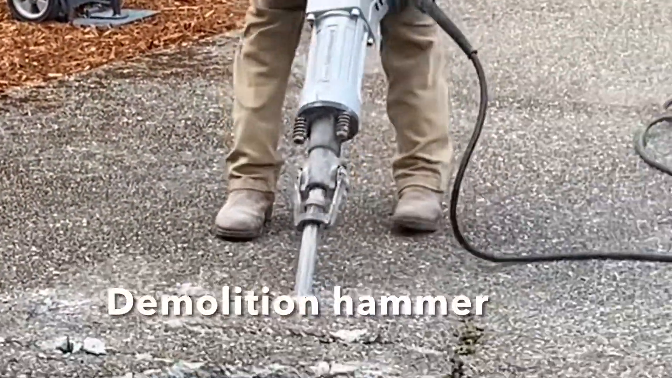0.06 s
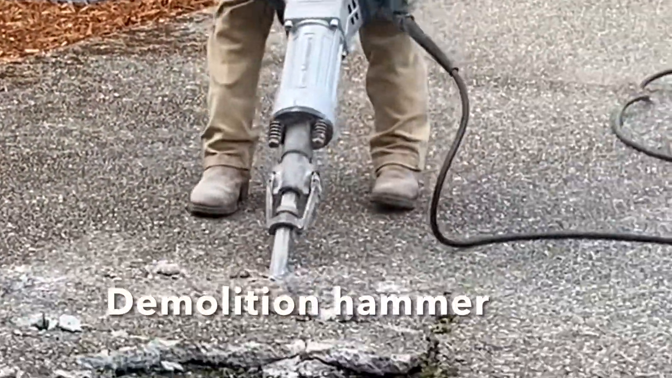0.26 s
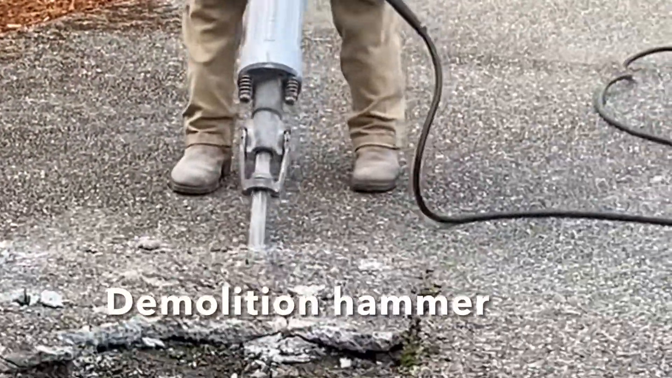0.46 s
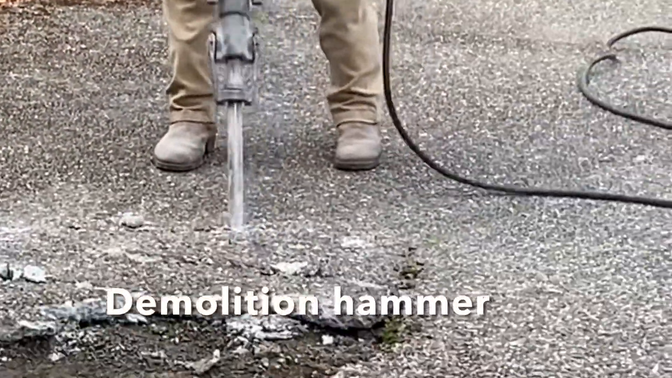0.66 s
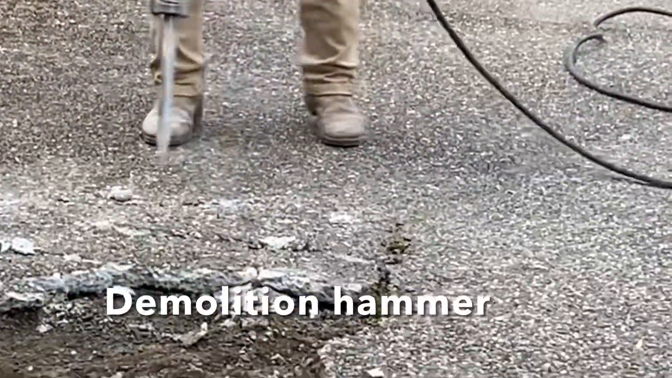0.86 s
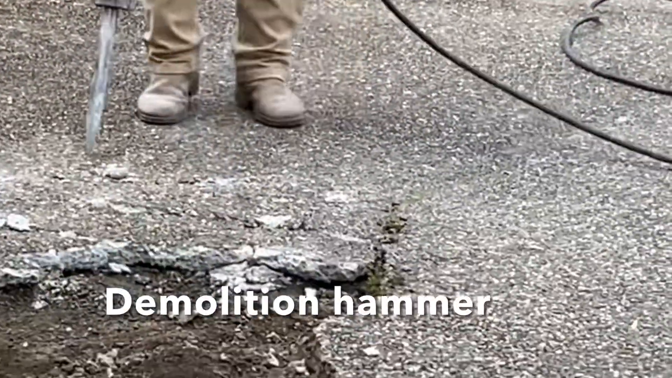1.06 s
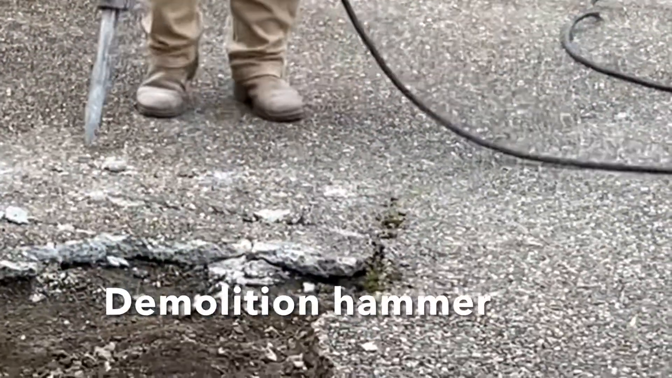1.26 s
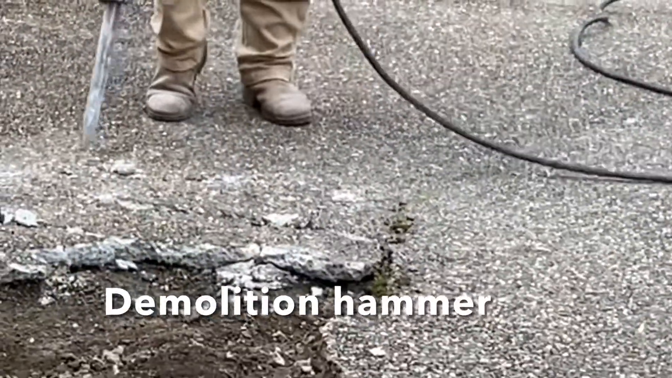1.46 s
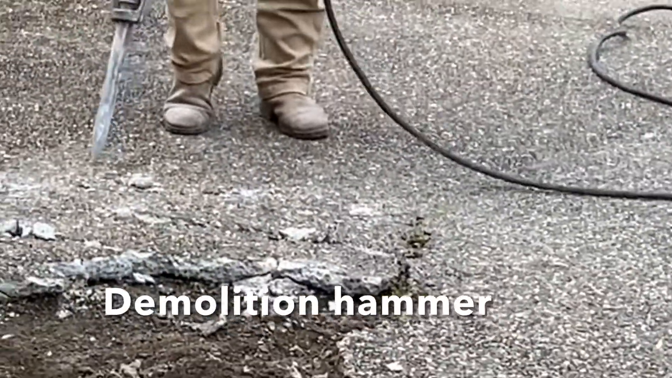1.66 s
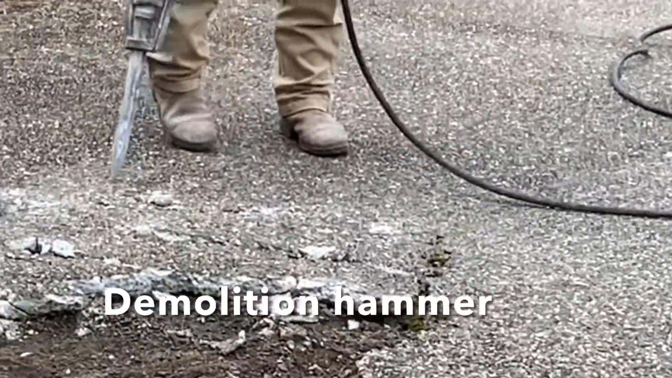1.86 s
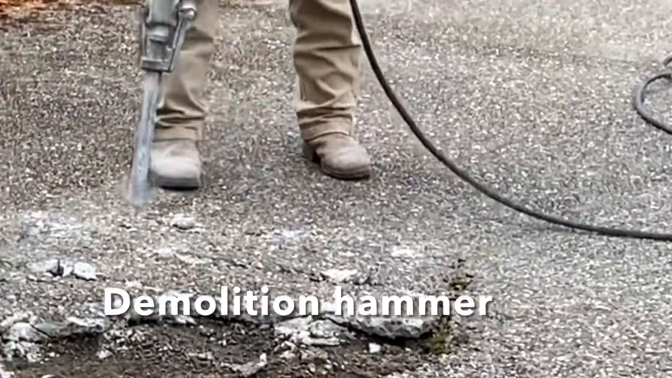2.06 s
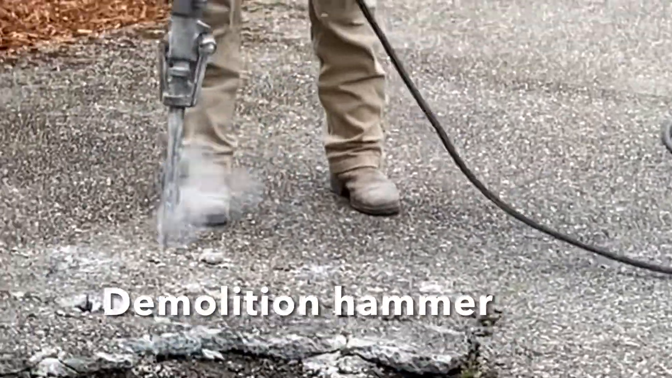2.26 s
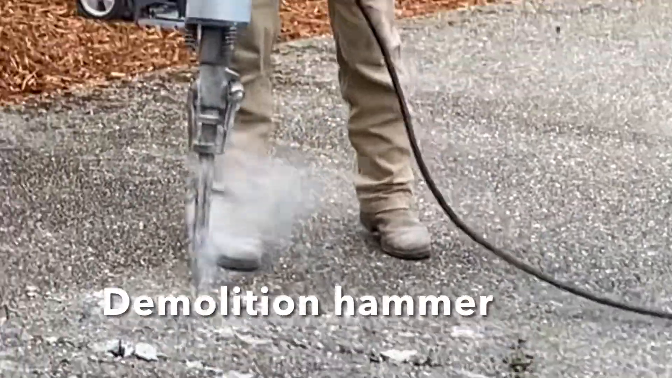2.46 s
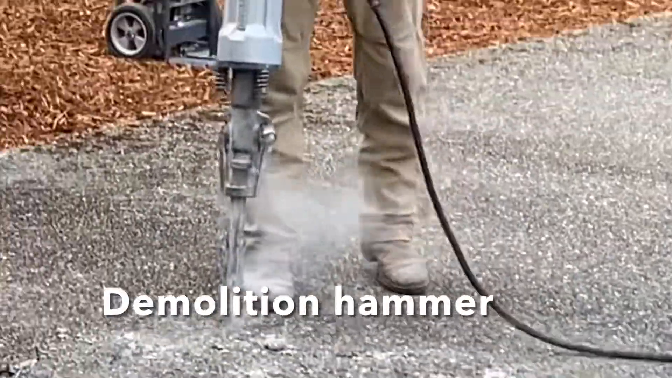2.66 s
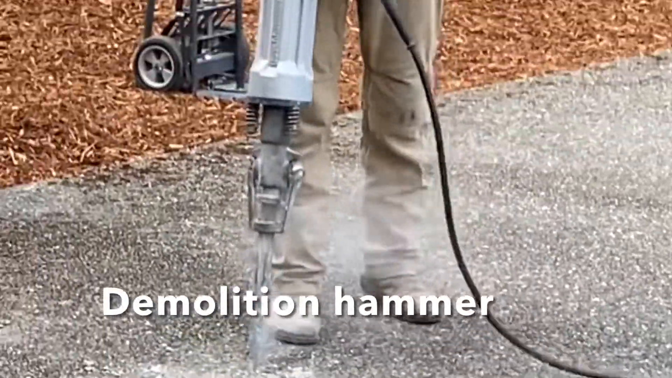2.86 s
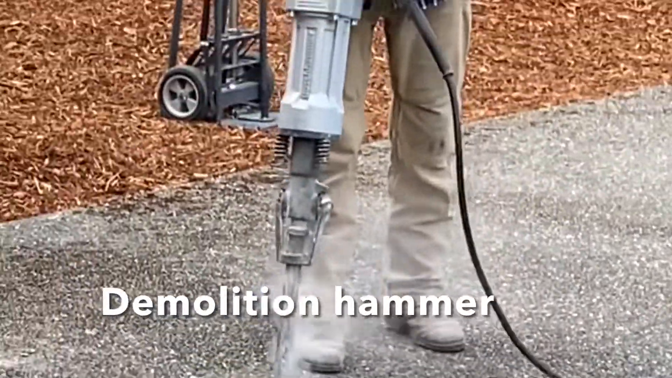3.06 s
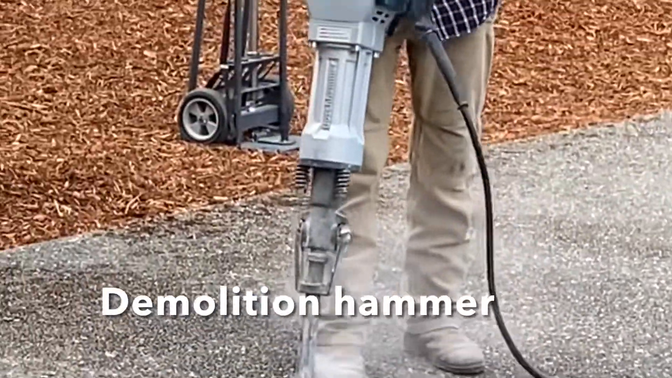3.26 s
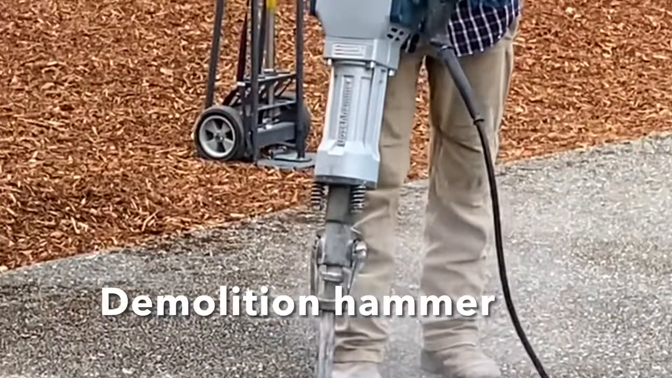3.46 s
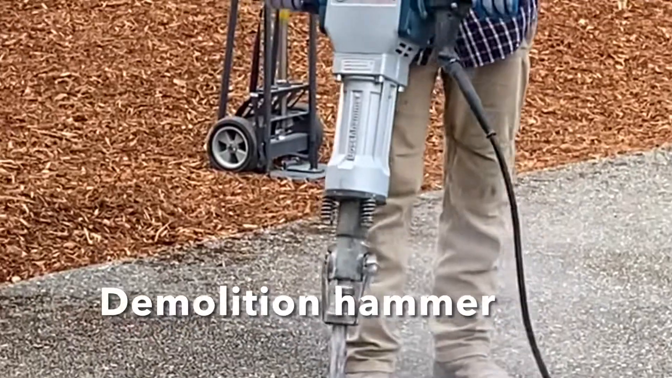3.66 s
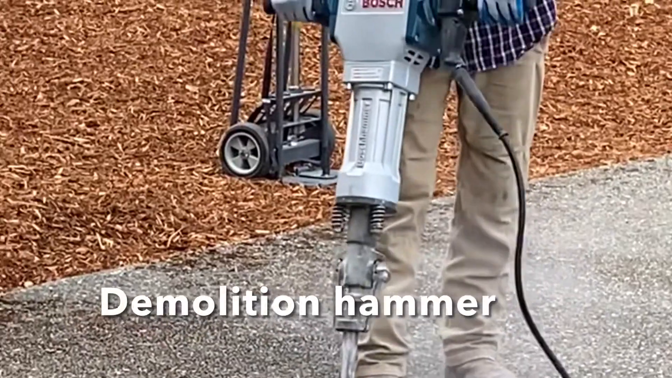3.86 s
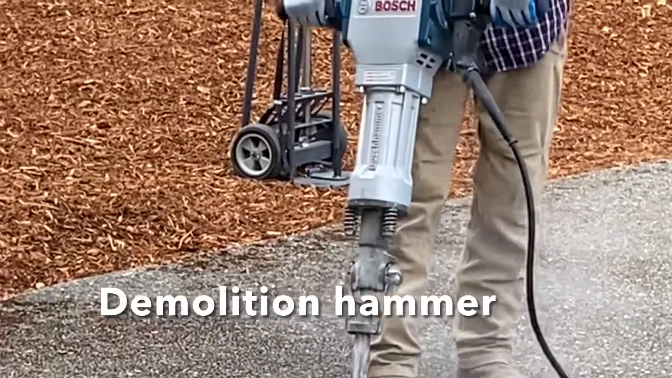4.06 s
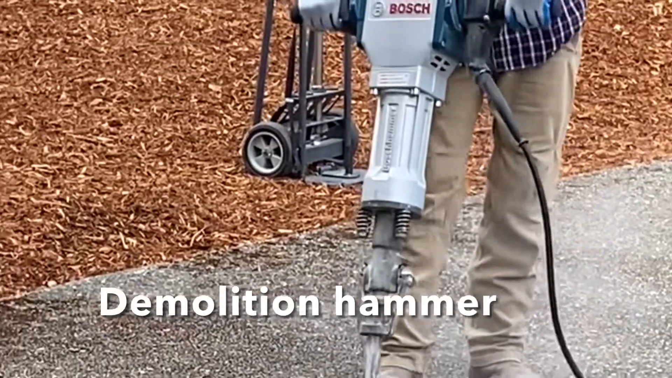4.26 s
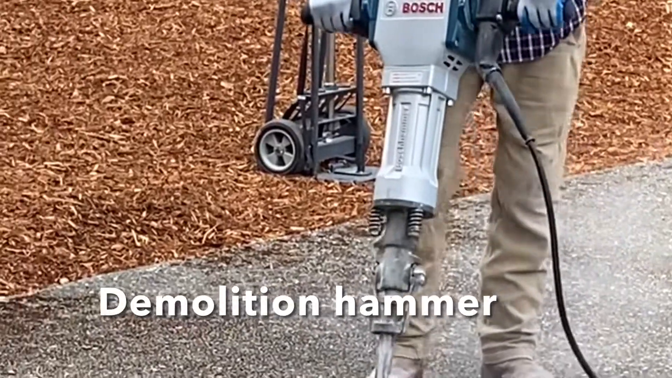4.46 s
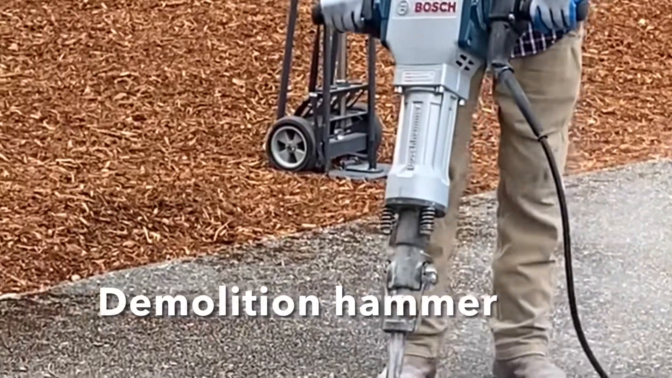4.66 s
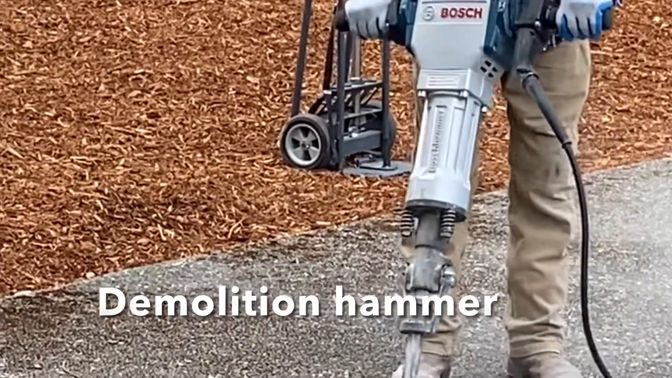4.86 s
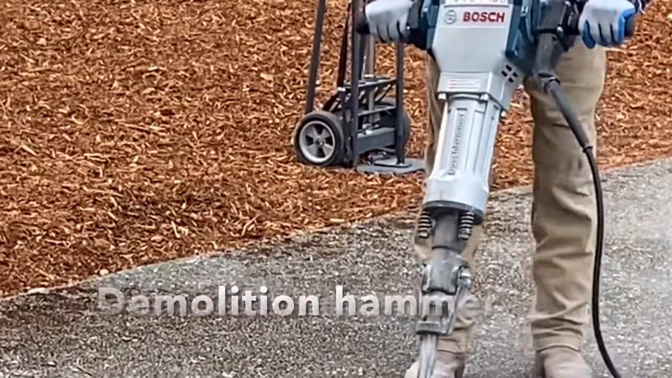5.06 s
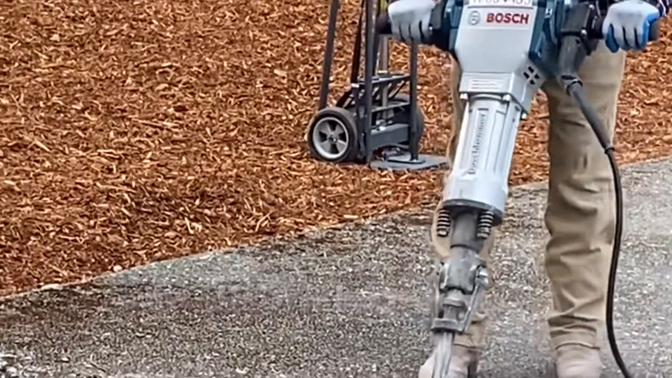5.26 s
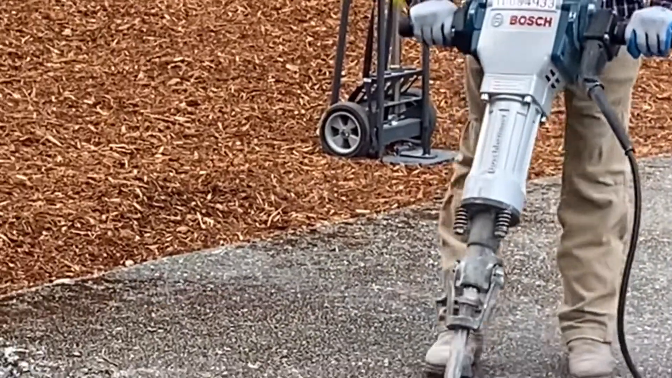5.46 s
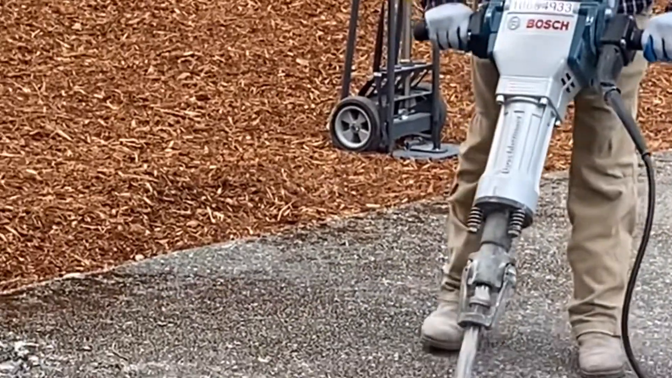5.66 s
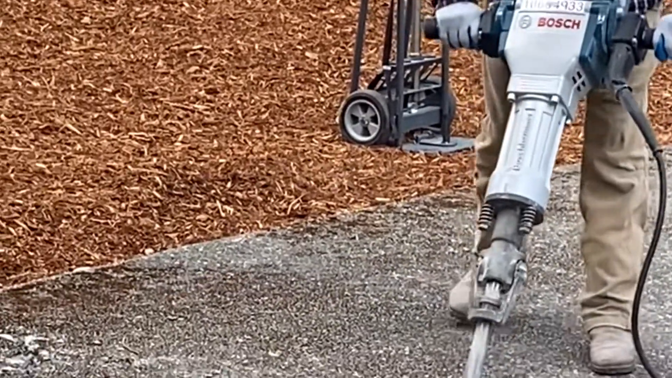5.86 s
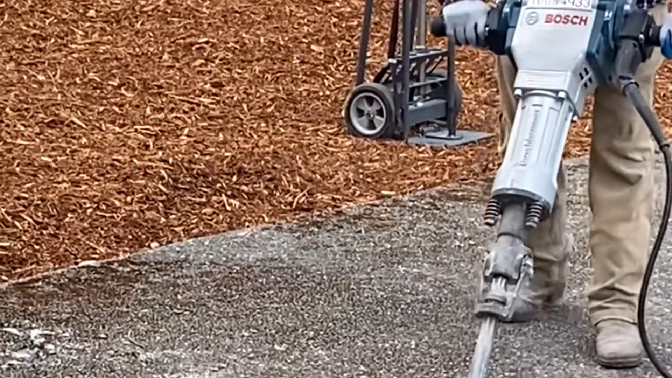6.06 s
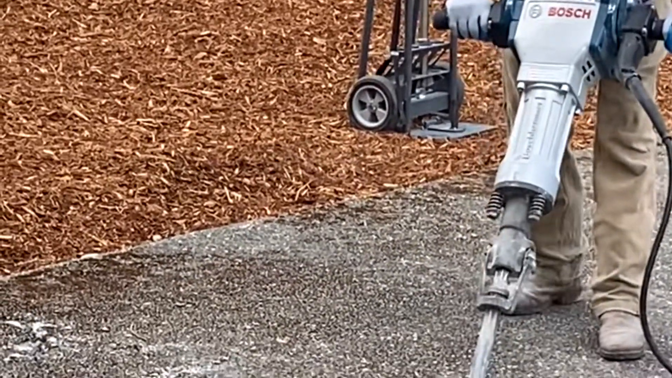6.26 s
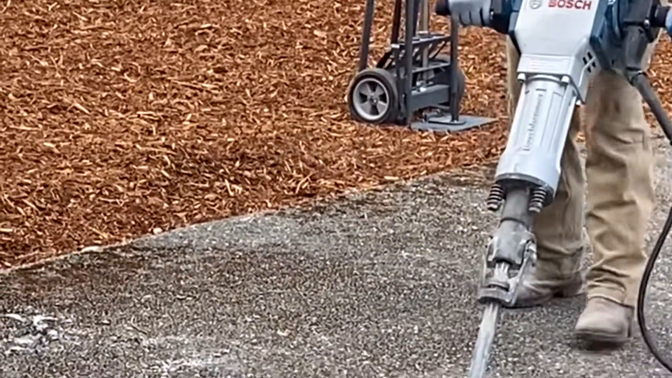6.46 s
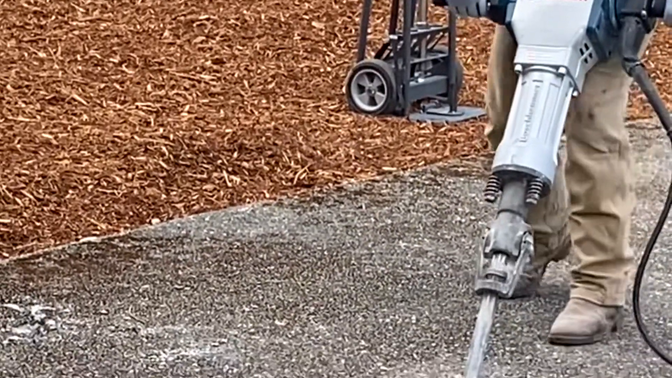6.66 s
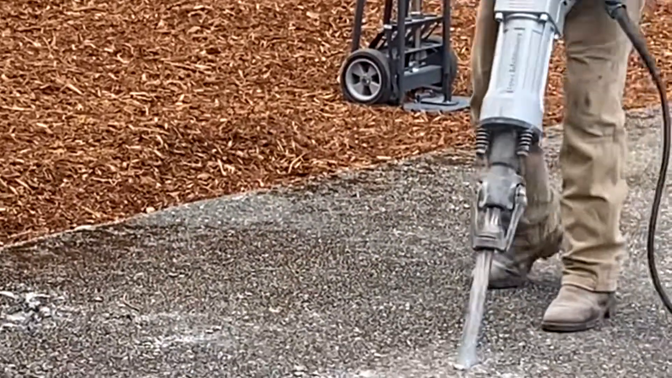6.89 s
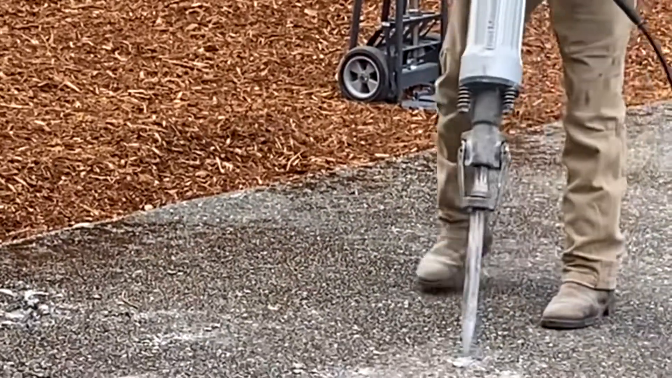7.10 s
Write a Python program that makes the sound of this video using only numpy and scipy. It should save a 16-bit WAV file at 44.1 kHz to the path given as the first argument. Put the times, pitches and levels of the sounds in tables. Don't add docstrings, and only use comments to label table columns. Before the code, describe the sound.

Outdoors a few metres away, an electric demolition hammer runs down while its loose steel bit clanks in the holder. The tip scrapes over clicking grit. The tool starts again, bouncing with sharp cracks and bright ringing steel, then bites into the concrete in a dense, even hammering with ground thuds and chips. It stops; the motor whine falls and the bit clangs once.

```python
import sys
import numpy as np
from scipy import signal
from scipy.fft import rfft, irfft, next_fast_len
from scipy.io import wavfile
from scipy.ndimage import uniform_filter1d, minimum_filter1d, map_coordinates

SR = 44100
rng = np.random.default_rng(int(sys.argv[2]) if len(sys.argv) > 2 else 0)


def dump(signal):
    limited = np.clip(np.atleast_2d(signal).T, -1, 1)
    pcm = np.round(limited * 32767).astype(np.int16)
    wavfile.write(sys.argv[1], SR, pcm)


def natural_amplitude(level_db):
    exponent = np.asarray(level_db, float) / 20
    return 10 ** exponent


N = 314433

RUN_S = (1.59, 6.17)

# start in seconds, low ring, high ring and bending ring in dB,
# seconds until the slab damps the tip.
BOUNCES = [(1.963, -39, -40.5, -34, 0.0137), (2.0603, -46, -36, -39, 0.035),
           (2.142, -21.5, -28, -35, 0.042), (2.217, -22, -29.5, -31, 0.052),
           (2.2905, -31, -26.5, -39, 0.024), (2.367, -23.5, -25.5, -36, 0.05),
           (2.4357, -41, -33, -38.5, 0.04), (2.5101, -29.5, -22.5, -38, 0.048),
           (2.58, -32, -21.5, -39, 0.022), (2.6538, -28.5, -23.5, -31.5, 0.038),
           (2.723, -26.5, -31.5, -42, 0.05), (2.789, -35, -36, -42, 0.028), (2.8617, -38, -34, -49, 0.043),
           (2.932, -38, -30, -54, 0.037), (3.005, -36, -53, -55, 0.014), (3.077, -34, -38, -50, 0.016),
           (3.148, -31.5, -37, -54, 0.049), (3.2187, -37, -54, -47, 0.014), (3.3564, -37, -46, -50, 0.025),
           (3.429, -37.5, -38.5, -55, 0.044), (3.499, -43, -52, -59, 0.037)]
# frequency in Hz, level in dB, T60 in seconds.
BIT_GROUPS = [
    [(5600, -5.5, 1)],
    [(11120, -2, 0.7), (11260, -8, 0.57)],
    [(4792, 0.5, 0.29), (3140, -13.5, 0.24), (6670, -7.5, 0.26)],
    [(8930, -2, 0.75)],
]
TWIST_DB = -14.5
RISE_S = [.0004, .0004, 0.0057, .002]
# start in seconds, level of the four groups in dB, seconds free.
CLANG = (6.843, -37, -30.5, -21, -31, 0.32)
# start in seconds, level in dB, high group in dB re low, seconds until damped.
CLANKS = [(.0005, -34, 7.5, 0.0068), (0.0576, -18.5, -1.5, 0.0032), (0.062, -19.5, -8.5, 0.004),
          (0.0656, -13, -12, 0.0025), (0.0686, -17, -12, 0.0054), (0.129, -25, -2.5, 0.0033),
          (0.1323, -14.5, -16, 0.003), (0.1352, -14.5, -17.5, 0.005), (0.197, -26.5, -3, 0.0077),
          (0.2068, -21.5, -19, 0.0055), (0.272, -19, -11.5, 0.0069), (0.3415, -17.5, -17.5, 0.0088),
          (6.844, -19, -13, 0.008), (6.894, -27.5, -14, 0.0082)]
# frequency in Hz, level in dB, T60 in seconds.
HOLDER = [
    [(5594, 3.5, 0.08), (5673, -1.5, 0.09), (3150, -25.5, 0.25), (4920, -17, 0.078)],
    [(11170, -5.5, .15), (11060, -9.5, .1)],
]
# frequency in Hz, level in dB, T60 in seconds.
SHANK = [(5610, -26, 2.4), (5650, -42, .9), (11180, -27, .9)]
# [Hz, dB, T60 in seconds].
SQUEAK = (.068, -27.5, .016, [(3070, -1.5, .2), (4800, -7, 0.22)])

# time in seconds, level in dB.
WHIRR = [(0, -35.5), (.11, -49.5), (.36, -50.5), (.44, -45), (.65, -42.5), (.98, -44.5), (1.01, -41.5),
         (1.1, -46), (1.21, -46.5), (1.75, -53.5), (1.9, -47.5), (1.98, -37.5), (2.9, -36), (3.16, -34),
         (3.31, -38), (5.4, -38), (6.1, -39), (6.67, -36), (7.13, -39)]
# frequency in Hz, density in dB per Hz.
GEARS = [(290, -26), (500, -8), (666, -2.5), (859, -1), (1480, -4.5), (2240, -4), (2740, -5), (3380, -1),
         (3940, -5.5), (5430, -5), (7000, -31.5), (9100, -23.5), (15400, -120)]
FAN = [(4500, -37), (6000, -2), (7400, 1), (8500, -2.5), (10300, -6), (12100, -6), (14000, -10),
       (15600, -12), (16200, -38)]
RUMBLE = [(76, -49), (130, -8), (184, 0), (434, -4), (510, -14), (700, -6.5), (910, -52), (1540, -120)]
# time in seconds, change in dB, half length in seconds.
DRAG = [(0.424, -3, .03), (0.507, 3.5, 0.023), (0.592, 5.5, .014), (0.633, -9, 0.012), (0.729, -8, 0.0062),
        (0.765, 2.5, .008), (0.83, -12, 0.0077), (0.919, -14, 0.008), (0.939, -10, .006), (0.98, -2, .008),
        (1.131, 9, 0.0072), (1.168, -8, 0.012), (1.247, -8, 0.0079), (1.272, 4, .008), (1.291, 5, .005),
        (1.333, -10, 0.0072), (1.405, -6, 0.0065), (1.489, 5, 0.0051), (1.506, -12, 0.006),
        (1.568, -10, 0.0047), (1.594, -16, 0.0078), (1.61, 4, .006), (1.697, -13, .01), (1.814, -13, .006)]
# time in seconds, gear mesh in Hz, mesh level in dB, commutator level in dB.
MESH = [(0, 1715, -56, -50), (.045, 1790, -49, -45), (.06, 1720, -58, -54), (.115, 1774, -69, -57),
        (.14, 1757, -75, -66), (.4, 1603, -73, -73), (1.9, 1499, -73.5, -69), (2.2, 1765, -46.5, -71),
        (3.5, 1744, -47.5, -60), (5.4, 1733, -48, -63), (5.7, 1766, -47, -54), (6, 1873, -48.5, -53),
        (6.22, 2034, -47, -50), (6.33, 2190, -43, -49), (6.4, 2242, -48, -53), (6.5, 2326, -47, -38),
        (6.58, 2223, -55, -50), (6.65, 2155, -56, -42), (6.75, 2030, -43.5, -53), (6.9, 1810, -52, -65),
        (7.13, 1700, -78, -67)]
# multiple, level in dB.
TEETH = [(1, -3), (2, 1), (3, -4)]
# crank turn 0-1, speed factor, load in dB.
CRANK = [(0, .94, -4), (.12, .96, -7), (.6, 1.03, -5), (.76, 1.02, 5.5), (1, 0.87, 4.5)]
# time in seconds, level in dB.
DRONE = [(0, -67), (.9, -66), (1.05, -54), (1.28, -52), (1.5, -60), (1.66, -53), (1.8, -59), (2.1, -54),
         (3.5, -51), (4.5, -49), (5.4, -54), (5.8, -60), (7.13, -56)]

# frequency in Hz, width in Hz, level in dB, arrival in seconds.
GROUND = [(66.5, 7.6, 1, 0.0442), (106, 20.7, -3, 0.0239), (51.6, 7, -13.5, 0.045)]
# frequency in Hz, level in dB.
DEEP = [(15, -55), (25, -37), (70, -2.5), (88, -4), (103, -9.5), (140, -13), (180, -57.5), (310, -120)]
# time in seconds, level in dB.
TRAFFIC = [(0, -70), (.9, -61.5), (1.05, -58.5), (7.13, -57.5)]
# frequency in Hz, T60 in seconds.
YARD = [(150, 0.85), (1000, 0.2), (4000, 0.28), (12000, 0.15)]

# start in seconds, crack in dB, thud and knock in dB re crack.
LOOSE = [(0.0563, -24.5, -7.5, -28), (0.128, -30, -34, -20.5), (0.1986, -45.5, -42, -39.5),
         (0.2685, -24, -40, -20.5), (0.34, -26.5, -21.5, -18.5), (0.9991, -33.5, -8.5, -16),
         (1.478, -52.5, -0.5, -14), (1.645, -56.5, -3, -1), (1.821, -41.5, -16, -20),
         (1.9626, -18.5, -10.5, -28), (2.0593, -12.5, -19.5, -27), (2.142, -13.5, -12, -25),
         (2.2184, -15.5, -7.5, -19), (2.2913, -13.5, -12, -12), (2.3645, -11, -11.5, -21),
         (2.4373, -14.5, -12.5, -14), (2.5091, -12, -10.5, -15), (2.5797, -20, -2.5, -10),
         (2.654, -18, -3.5, -7.5), (2.7217, -20.5, -2.5, -10.5), (2.7908, -14, -9.5, -18),
         (6.771, -20.5, -9, -23.5), (6.8227, -33, -12, -13), (6.8277, -28, -7.5, -14.5),
         (6.845, -21.5, -45, -11.5)]
# start in seconds, peak in dB, thud and knock in dB re peak.
STRUCK = [(2.8606, -8, -22.5, -29), (2.9313, -8, -21.5, -32.5), (3.005, -9.5, -22, -30),
          (3.0748, -7, -21.5, -31), (3.1462, -10, -20, -24), (3.217, -7.5, -20.5, -29.5),
          (3.2886, -11, -17, -24.5), (3.3573, -8, -19.5, -26), (3.429, -11.5, -16, -20),
          (3.4997, -9, -18.5, -26.5), (3.5694, -10, -18, -22.5), (3.6404, -7.5, -18, -25),
          (3.7119, -6.5, -20.5, -27), (3.784, -6.5, -20.5, -31), (3.855, -8.5, -18, -23),
          (3.9263, -8, -16.5, -22.5), (3.9985, -9, -16.5, -21), (4.07, -8, -17, -24.5),
          (4.1423, -8, -16, -18.5), (4.2145, -7, -16, -23), (4.287, -8, -16.5, -23),
          (4.3593, -9, -17.5, -22), (4.433, -8, -20.5, -23.5), (4.5061, -7.5, -20.5, -24),
          (4.58, -9, -20.5, -23), (4.6534, -8.5, -22.5, -22), (4.727, -8.5, -21.5, -25.5),
          (4.8019, -8, -21, -28), (4.8746, -6, -22.5, -21), (4.949, -6, -21.5, -24.5),
          (5.0218, -7.5, -19.5, -23), (5.0948, -7, -21, -22.5), (5.168, -6, -23, -25),
          (5.2425, -7, -23, -23), (5.3166, -6, -22.5, -28), (5.39, -6.5, -24.5, -25.5),
          (5.4645, -5.5, -31.5, -25), (5.5378, -5, -34, -25.5), (5.61, -5, -34, -26.5),
          (5.6827, -4, -38, -26.5), (5.7543, -6, -35, -24.5), (5.825, -6.5, -32, -23),
          (5.8959, -6, -32.5, -24.5), (5.9658, -7, -33.5, -23), (6.0344, -9.5, -28, -22),
          (6.101, -10.5, -24.5, -19.5), (6.1651, -17, -23, -14.5)]
STRUCK_DB = [-7.5, 11.5, 8.5]
# time in seconds, level in dB.
BITE = [(2.86, -41), (3.1, -33.5), (3.42, -37.5), (3.75, -38.5), (4.15, -37.5), (4.45, -36), (4.73, -40.5),
        (5.05, -41), (5.4, -49), (5.6, -38), (5.75, -45.5), (6.08, -42), (6.17, -51)]
# frequency in Hz, level in dB.
CRACK = [(880, -7), (1500, -12), (2540, -6), (3520, -4), (4270, -2.5), (5620, 2), (6030, -3.5),
         (7310, -8.5), (8600, -7.5), (9720, -6), (11900, -6), (13500, -12), (15300, -7.5), (16300, -41),
         (16800, -40)]
KNOCK = [(300, -18.5), (500, 0.5), (750, 0), (1000, -5.5), (1500, -4), (2100, -10.5), (3000, -30.5)]
# frequency in Hz, width in Hz, extra gain.
STRIKER = [(3570, 210, 2.36), (5690, 380, 2.16)]
# frequency in Hz, width in Hz, level in dB, arrival in seconds.
SLAB = [(251.7, 26.3, 1, 0.0158), (434.3, 39.5, -2.5, 0.00921), (160.5, 35, -9, 0.0161),
        (339, 36, -10, 0.0119)]
# time in seconds, slow ground waves, shank tone and top of the crack in dB.
SINK = [(2, -0.5, 2, 5.5), (2.5, -2, 6, 3.5), (3.2, -3, 5, -2), (3.7, -3, 1.5, -1), (4.2, -5, -4.5, -2.5),
        (4.5, 2.5, -5.5, 1), (5.2, 6.5, -3, 2), (5.45, 7, 1, 2.5), (5.7, -5, -0.5, -3), (5.899, -2, -8, 0),
        (6.15, -2.5, -4, -9.5)]

# start in seconds, peak in dB.
TICKS = [(0.714, -33), (1.0034, -35), (1.011, -29.5), (1.0218, -38.5), (1.134, -41), (1.4873, -45),
         (1.515, -44), (1.553, -37), (1.577, -46), (1.6077, -54), (1.713, -43), (2.488, -24), (2.628, -27),
         (6.7549, -30), (6.974, -30)]
# from and to in seconds, first and last Hz, level in dB re crack.
SEATED = [(2.28, 2.85, 780, 900, -12), (2.26, 2.6, 870, 1200, -17.5), (3.3, 5.6, 735, 700, -12),
          (3.8, 4, 1100, 960, -15), (4.7, 6.4, 830, 1000, -11.5), (4.34, 5.88, 1210, 1350, -13),
          (3.86, 3.6, 1590, 1300, -12.5), (3.9, 4.7, 1800, 1800, -17), (3.5, 6.4, 3560, 3620, -11.5),
          (4.6, 5.6, 3580, 3600, -8), (4.0, 5.9, 4800, 4700, -12.5), (4.5, 6.4, 3100, 3060, -13.5)]

# frequency in Hz, likeness 0-1.
ALIKE = [(150, .995), (300, .9), (640, .68), (1400, .72), (3100, .88), (6800, .88), (15000, .75)]
# frequency in Hz, phase in radians.
LEAD = [(60, 0), (200, -.2), (350, -.55), (750, -.65), (1400, -.45), (2400, .42), (3300, .25), (5700, .95),
        (6300, 1.7), (7400, 3.14), (10400, 6.28), (13450, 9.42), (16300, 12.3)]
# frequency in Hz, level in dB.
TILT = [(60, 0), (110, 0), (200, 1.5), (380, 1), (700, 0), (1290, -1.5), (2380, 0), (15000, 0)]
# centre in Hz, half width in Hz.
GAPS = [
    [(7400, 950), (13300, 1250), (17000, 1250)],
    [(3450, 1650), (10450, 900), (17000, 1500)],
]
SPARED_HZ = [13700, 6000]


def unit(x):
    return x / np.sqrt(np.mean(x ** 2) + 1e-20)


def along(points, hz):
    f, v = np.transpose(points)
    return np.interp(np.log(hz + 1), np.log(f + 1), v)


def curves(rows):
    s, *cols = np.transpose(rows)
    return [np.interp(np.arange(N) / SR, s, c) for c in cols]


def wobble(rate):
    at = np.arange(0, N + 16, 16)
    knots = rng.standard_normal(int(N * rate / SR) + 4)
    return np.interp(np.arange(N), at, map_coordinates(knots, [at * rate / SR]))


def filtered(x, response):
    n = x.shape[-1]
    m = next_fast_len(n + SR // 4)
    return irfft(rfft(x, m) * response(np.fft.rfftfreq(m, 1 / SR)), m)[..., :n]


def add(track, s, x):
    part = track[round(s * SR):][:len(x)]
    part += x[:len(part)]


def rush(spectrum, patchy_db):
    z = signal.stft(rng.standard_normal((2, N)), nperseg=512)[2]
    field = uniform_filter1d(uniform_filter1d(rng.standard_normal(z.shape[1:]), 8, 0), 6, 1)
    pair = signal.istft(z * natural_amplitude(patchy_db * unit(field)), nperseg=512)[1][:, :N]
    return unit(filtered(pair, lambda hz: natural_amplitude(along(spectrum, hz))))


def waves(modes):
    return lambda hz: sum(natural_amplitude(db) * np.exp(-.5 * ((hz - c) / w) ** 2 - 2j * np.pi * hz * late)
                          for c, w, db, late in modes)


def ring(modes, free, damped_db, grip, rough_db=1.5, bend=0, rise=0.00034, size=SR // 7):
    t = np.arange(size) / SR
    gripped = (t - free) / grip
    hold = natural_amplitude(damped_db * np.clip(gripped, 0, 1)) * (1 - np.exp(-t / rise))
    bent = t + bend * np.cumsum(np.clip(gripped + 1, 0, 2) / 2) / SR
    total = np.zeros(size)
    for hz, db, t60 in modes:
        rub, slip = [map_coordinates(rng.standard_normal(60), [t * 150]) for _ in range(2)]
        tone = np.sin(2 * np.pi * hz * bent + .18 * rough_db * slip)
        total += natural_amplitude(db + rough_db * rub - 60 * t / t60) * tone
    return hold * total


def bit():
    track, t = np.zeros(N), np.arange(SR // 20) / SR
    for s, db, high_db, free in CLANKS:
        for level_db, group in zip((db, db + high_db), HOLDER):
            add(track, s, natural_amplitude(level_db + 4.5) * ring(group, free, damped_db=-17.0, grip=0.0052, rough_db=1.0))
        if s < RUN_S[0]:
            tone = ring(SHANK, free, damped_db=-1, grip=0.93, rough_db=4.0, size=SR // 3)
            add(track, s, natural_amplitude(db - 11.0) * tone)
        hiss = uniform_filter1d(rng.standard_normal(len(t)), size=3) * 1.55
        add(track, s, natural_amplitude(db - 19.0 - 60 * np.clip(t - free, 0, 1) / 0.056) * hiss)
    s, db, free, modes = SQUEAK
    add(track, s, natural_amplitude(db) * ring(modes, free, damped_db=-25.5, grip=.012, bend=.04))

    bends, losses_db, rubs_db = [.03, 0, .015, 0], [-20, -15, -18, -20], [2.6, 4.5, 3.8, 5]
    bounces = [(s, low, high, bend, high + TWIST_DB, free) for s, low, high, bend, free in BOUNCES]
    for s, *levels, free in bounces + [CLANG]:
        lifted = s == CLANG[0]
        size = round(free * SR) + SR // 7
        for db, group, bend, loss_db, rub_db, rise in zip(levels, BIT_GROUPS, bends, losses_db, rubs_db, RISE_S):
            if lifted:
                tone = ring(group, free, -27, grip=.06, rough_db=.7 * rub_db, rise=rise, size=size)
            else:
                tone = ring(group, free, loss_db, grip=0.006, rough_db=rub_db, bend=bend, rise=rise, size=size)
            add(track, s, natural_amplitude(db + 7.5) * tone)
    return track


def rattle():
    rattle_db, t60 = -3, 0.13
    kicks = np.zeros(N)
    rings = [(row[0], row[2]) for row in BOUNCES + [CLANG]]
    clanks = [(row[0], row[1] + row[2]) for row in CLANKS]
    for s, db in rings + clanks:
        kicks[round(s * SR)] += natural_amplitude(2 * (db + rattle_db))
    return np.sqrt(signal.lfilter([1], [1, -natural_amplitude(-120 / (t60 * SR))], kicks))


def drag():
    t = np.arange(N) / SR
    return sum(db * np.exp(-((t - s) / half) ** 2) for s, db, half in DRAG)


def busy():
    t = np.arange(N) / SR
    return uniform_filter1d(1. * (t > RUN_S[0]) * (t < RUN_S[1]), size=SR // 20)


def motor():
    gear_db, = curves(WHIRR)
    fan_db = -52.5 + 1.53 * (gear_db + 38.5) + 6.5 * busy()
    rumble_db = -57.5 + (gear_db + 37.5) + 12 * busy()
    scrape_db = (gear_db < -42) * wobble(45) + drag()
    shake_db = 1.2 * wobble(25) + 1.2 * wobble(90) + scrape_db
    gears = natural_amplitude(gear_db - 3.0 + shake_db) * rush(GEARS, patchy_db=1.8)
    fan = np.hypot(natural_amplitude(fan_db), rattle()) * natural_amplitude(0.57 * shake_db) * rush(FAN, patchy_db=3.5)
    rumble = natural_amplitude(rumble_db + 1.1 * wobble(14)) * rush(RUMBLE, patchy_db=2.5)
    return gears + fan + rumble


def whine(rows):
    mesh_hz, mesh_db, thin_db = curves(MESH)
    t = np.arange(N) / SR
    times = rows[(rows[:, 0] > RUN_S[0]) & (rows[:, 0] < RUN_S[1]), 0]
    crank = np.interp(t, times, np.arange(len(times))) % 1
    at, speed, load_db = np.transpose(CRANK)
    loaded = (t > times[0]) & (t < times[-1])
    braked = np.where(loaded, np.interp(crank, at, speed), 1)
    turn = 2 * np.pi * np.cumsum(mesh_hz * braked * (1 + 0.00252 * wobble(30))) / SR
    mesh = np.zeros(N)
    for k, db in TEETH:
        level = natural_amplitude(db + 1.5 - 11 * (k - 1.39) * ~loaded)
        fuzz = np.where(loaded, .8 + .45 * wobble(80), .5 + .8 * wobble(120))
        mesh += level * fuzz * np.sin(k * (turn + 2.0 * ~loaded * wobble(70)))
    mesh *= natural_amplitude(mesh_db + loaded * np.interp(crank, at, load_db))
    thin = natural_amplitude(thin_db + 2.5 + 1.5 * wobble(25)) * np.sin(turn * 3 / 2)
    drone_level = natural_amplitude(curves(DRONE)[0] + 3 + 2 * wobble(12) + drag()) * (.8 + .4 * wobble(100))
    drone = drone_level * np.sin(2 * np.pi * 2385 * t + 2.3 * wobble(80))
    return mesh + thin + drone


def ground(rows):
    push = np.zeros(N)
    at = np.round(rows[:, 0] * SR).astype(int)
    push[at] = natural_amplitude(rows[:, 4])
    slow, quick = filtered(push, lambda hz: np.array([waves(GROUND[::2])(hz), waves(GROUND[1::2])(hz)]))
    power = np.mean(np.abs(waves(GROUND)(np.arange(SR // 2))) ** 2) * len(at) / N
    shake = (natural_amplitude(curves(SINK)[0]) * slow + quick) / np.sqrt(power)
    swell = uniform_filter1d(push, size=round(.09 * 2 * SR)) * SR / 14
    traffic = natural_amplitude(curves(TRAFFIC)[0] + 1.2 * wobble(8.3))
    return 0.69 * shake + (.18 * swell + traffic) * rush(DEEP, patchy_db=1.2)[0]


def yard(x):
    hz, t, z = signal.stft(rng.standard_normal((2, SR // 3)), SR, nperseg=256)
    tail = signal.istft(z * natural_amplitude(-60 * t / along(YARD, hz)[:, None]), SR, nperseg=256)[1]
    late = np.pad(x, (250, 0))
    return signal.fftconvolve(late[None], tail / np.linalg.norm(tail[0]), axes=1)[:, :N]


def strikes():
    struck = np.array(STRUCK) + [0, *STRUCK_DB]
    shake = np.interp(struck[:, 0], *np.transpose(BITE)) - 0.2 * rng.standard_normal(len(struck))
    loose = np.array(LOOSE)
    loose_shake = np.minimum(loose[:, 1] + loose[:, 2] - 13, -34.5)
    rows = np.vstack([np.c_[loose, loose_shake], np.c_[struck, shake]])
    return rows[np.argsort(rows[:, 0])]


def blows(rows):
    track, push, t = np.zeros(N), np.zeros((len(SLAB), N)), np.arange(SR // 12) / SR
    shape = (1 - np.exp(-t / 0.00029)) * (natural_amplitude(-60 * t / 0.021) + natural_amplitude(-24.5 - 60 * t / 0.17))
    knock_shape = (1 - np.exp(-t / 0.0032)) * natural_amplitude(-60 * t / 0.047)
    contact = signal.lfilter([1], [1, -0.6], rng.standard_normal((len(rows), 2, len(t))), axis=0)
    free = np.clip(-(rows[:, 2:3] + 6) / 16, 0, 1)
    at, _, shank_db, top_db = np.transpose(SINK)
    shank_now, top_now = [np.interp(rows[:, :1], at, db) for db in (shank_db, top_db)]

    def crack_colour(hz):
        steel = 1 + free * sum(g / (1 + ((hz - c) / w) ** 2) for c, w, g in STRIKER)
        shank = shank_now * np.exp(-((hz - 5350) / 500) ** 2)
        top = top_now / (1 + (11700 / (hz + 1)) ** 8)
        return natural_amplitude(along(CRACK, hz) + shank + top) * steel

    cracks = filtered(contact[:, 0], crack_colour)
    knocks = filtered(contact[:, 1], lambda hz: natural_amplitude(along(KNOCK, hz / (1 + 0.23 * free))))
    grows = np.array([0, 0.56, 0.0013, 0])
    each = np.arange(len(SLAB))
    for (s, db, thud_db, knock_db, _), crack, knock in zip(rows, cracks, knocks):
        add(track, s, natural_amplitude(db + 5.0) * unit(crack) * shape)
        add(track, s, natural_amplitude(db + knock_db + 10.0) * unit(knock) * knock_shape)
        start = np.round((s + 0.00093 * rng.standard_normal(len(SLAB))) * SR).astype(int)
        chance_db = 0.46 * rng.standard_normal(len(SLAB))
        push[each, start] = natural_amplitude(db + thud_db + 49.5 + (thud_db + 7.0) * grows + chance_db)
    thuds = filtered(push, lambda hz: np.array([waves([wave])(hz) for wave in SLAB]))
    return track + thuds.sum(axis=0)


def grit():
    track, t = np.zeros(N), np.arange(SR // 30) / SR
    for s, db in TICKS:
        click = np.diff(uniform_filter1d(rng.standard_normal(len(t) + 1), size=3)) * 2
        add(track, s, natural_amplitude(db - 14.5 - 60 * t / .02) * click)
    return track


def chips():
    count, life_cycles = 700, 8
    at, pitch, size = rng.random(count), rng.standard_normal(count), rng.exponential(size=count)
    hz = np.clip(2310 * np.exp(.55 * pitch), 500, 9000)[:, None]
    k = np.arange(400)
    level = natural_amplitude(-49 + 3.6 * np.minimum(size, 3))[:, None]
    grains = level * np.exp(-k * hz / (life_cycles * SR)) * np.sin(2 * np.pi * hz * k / SR)
    start = ((1.97 + at * (RUN_S[1] - 1.9)) * SR).astype(int)[:, None]
    return np.bincount((start + k).ravel(), grains.ravel(), N)


def seated(rows):
    track, t = np.zeros(N), np.arange(SR // 14) / SR
    start, end, first_hz, last_hz, level_db = np.transpose(SEATED)[:, :, None]
    chances = rng.standard_normal((len(rows), 2, len(SEATED), 1))
    for (s, db, *_), (pitch, loud) in zip(rows, chances):
        depth = np.clip((s - start) / (end - start), 0, 1)
        hz = (first_hz + (last_hz - first_hz) * depth) * (1 + .008 * pitch)
        t60 = along([(700, 0.061), (4000, 0.046)], hz)
        level = np.sqrt(np.sin(np.pi * depth) + 1e-12) * natural_amplitude(level_db + 3 * loud - 60 * t / t60)
        modes = level * np.sin(2 * np.pi * hz * t) * (1 - np.exp(-t * hz / 2))
        add(track, s, natural_amplitude(db) * modes.sum(axis=0))
    return track


def ports(common, apart):
    turn = lambda hz: np.arccos(np.clip(along(ALIKE, hz), -1, 1)) / 2
    mid, side = filtered(apart, lambda hz: np.array([np.cos(turn(hz)), np.sin(turn(hz))]))
    half = lambda hz: natural_amplitude(along(TILT, hz) / 2) * np.exp(.5j * along(LEAD, hz))
    pair = common + np.array([mid + side, mid - side])
    return filtered(pair, lambda hz: np.array([half(hz), 1 / half(hz)]))


def scene():
    rows = strikes()
    hits = bit() + blows(rows) + grit() + chips() + seated(rows)
    return ports(hits + whine(rows) + ground(rows), motor() + natural_amplitude(-24.5) * yard(hits))


def roll_off(x):
    return signal.sosfilt(signal.butter(12, 17140, fs=SR, output="sos"), x)


def record(dry):
    cut = filtered(dry, lambda hz: (hz < 16750) / np.sqrt(1 + (45 / (hz + 1)) ** 8))
    cut = cut / (1 + np.abs(cut / .92) ** 6) ** (1 / 6)

    masker, masked_sum, masked_side = (11150, 200), (14800, 2000), (16000, 1500)
    bands = lambda parts: lambda hz: np.array(
        [sum(np.exp(-((hz - c) / w) ** 4) for c, w in part) for part in parts])
    power, loud, hidden = filtered(cut[0], bands([GAPS[0], [masker], [masked_sum]])) ** 2
    usual = signal.medfilt(uniform_filter1d(power, 512)[::64], 41).repeat(64)[:N]
    calm = uniform_filter1d(power, 128) < 4 * usual
    calm = uniform_filter1d(minimum_filter1d(calm * 1., 200), 128)
    masked = uniform_filter1d(loud - 7 * hidden, 600) > 0

    sum_and_difference = np.array([cut[0] + cut[1], cut[0] - cut[1]]) / 2
    hz, t, z = signal.stft(sum_and_difference, SR, nperseg=512)
    bins, frames = 4, 8
    chance = rng.random((2, len(hz) // bins + 1, len(t) // frames + 1))
    chance = chance.repeat(bins, 1).repeat(frames, 2)[:, :len(hz), :len(t)]
    centre = (np.arange(len(hz)) // bins + .5) * bins * hz[1]
    masked_now = masked[np.minimum((t * SR).astype(int), N - 1)]
    weak = bands(GAPS)(centre)[..., None] + bands([[masked_sum], [masked_side]])(centre)[..., None] * masked_now
    shares = [[.1, .22], [.3, .04]]
    spared = np.array([np.where(hz < edge, *share) * (hz < 15700) for share, edge in zip(shares, SPARED_HZ)])
    emptied = np.minimum(weak, 1) * (1 - spared[..., None]) > .02 + .96 * chance
    both, apart = signal.istft(z * emptied, SR, nperseg=512)[1][:, :N]
    mix = cut - calm * np.array([both + apart, both - apart])
    return roll_off(mix)


dry = scene()
out = record(dry)
dump(out)
```